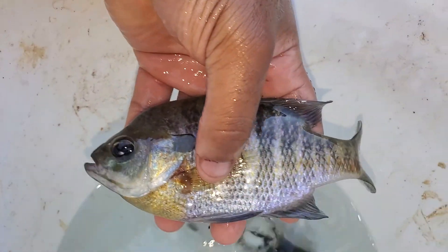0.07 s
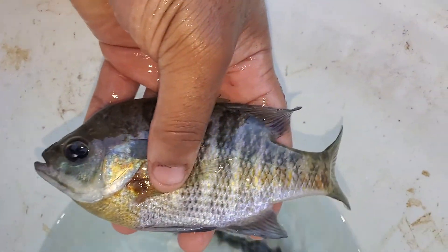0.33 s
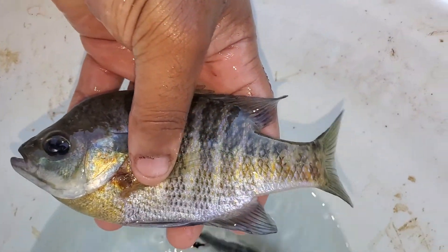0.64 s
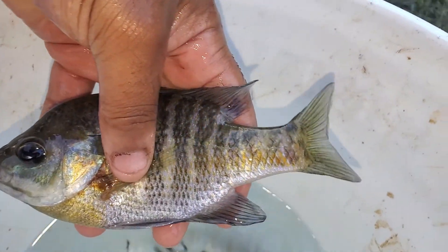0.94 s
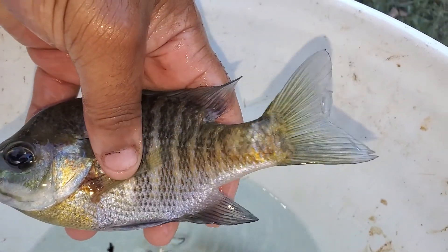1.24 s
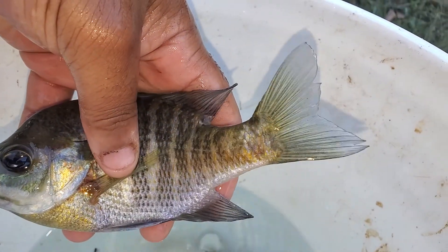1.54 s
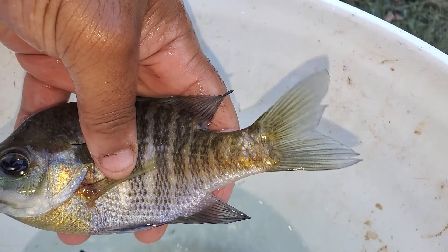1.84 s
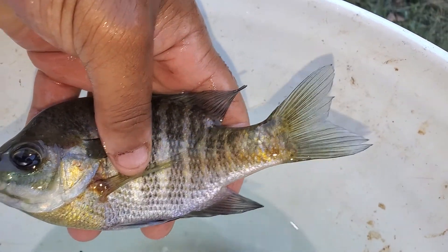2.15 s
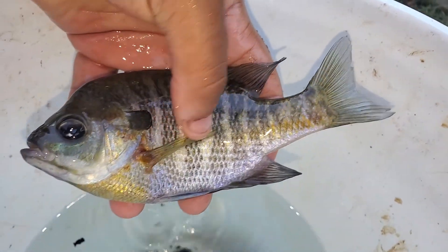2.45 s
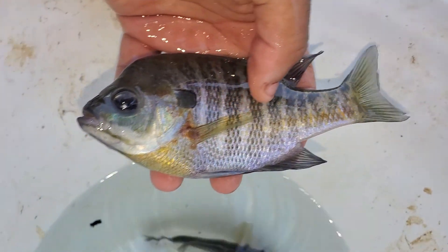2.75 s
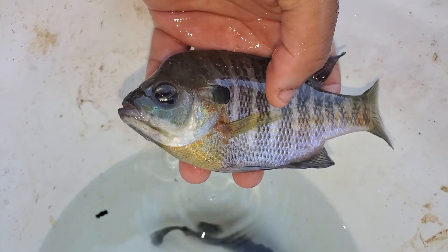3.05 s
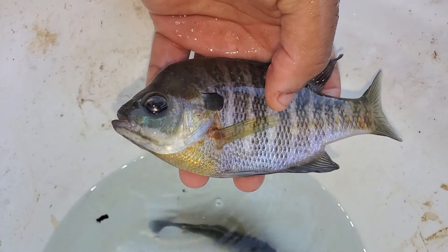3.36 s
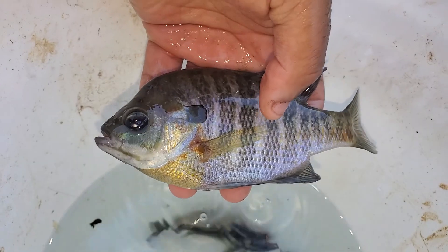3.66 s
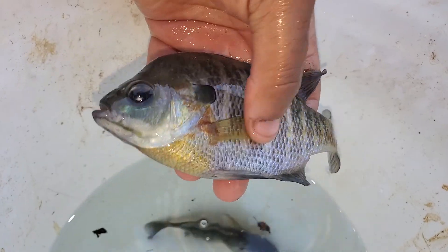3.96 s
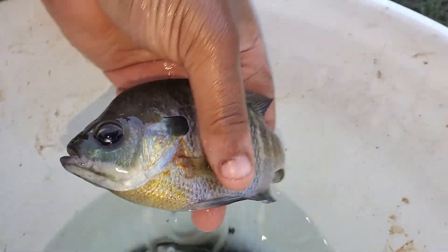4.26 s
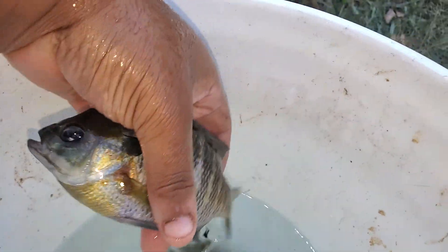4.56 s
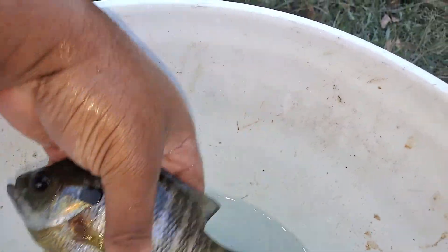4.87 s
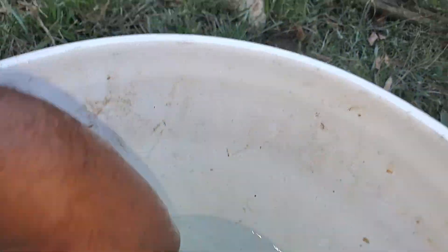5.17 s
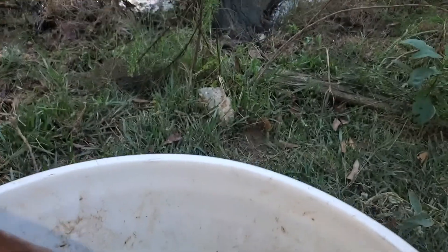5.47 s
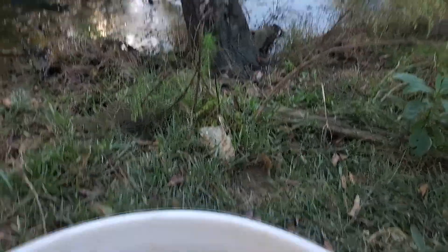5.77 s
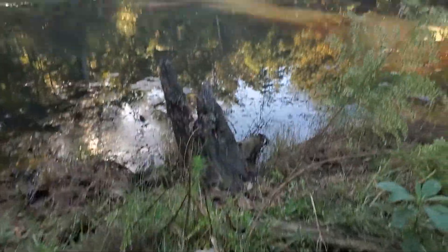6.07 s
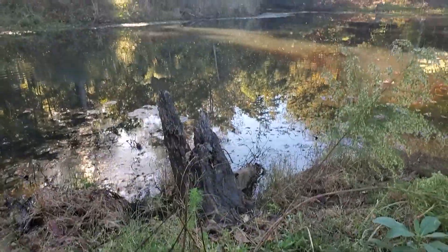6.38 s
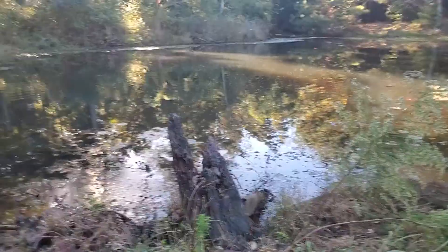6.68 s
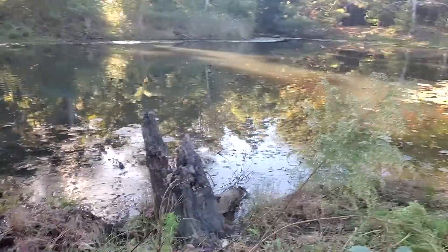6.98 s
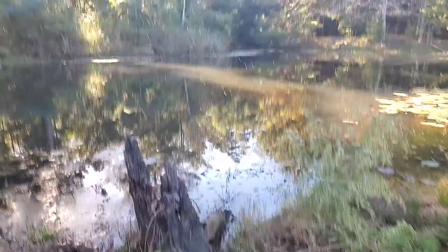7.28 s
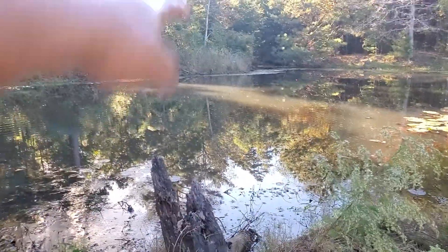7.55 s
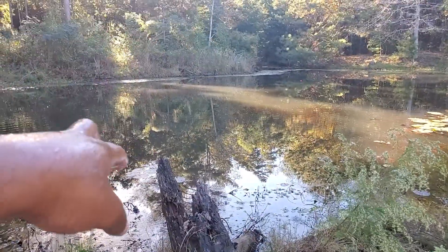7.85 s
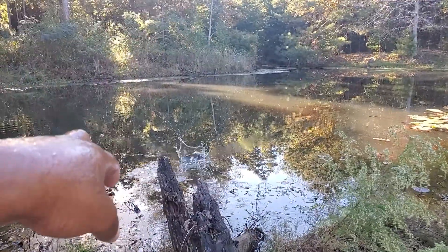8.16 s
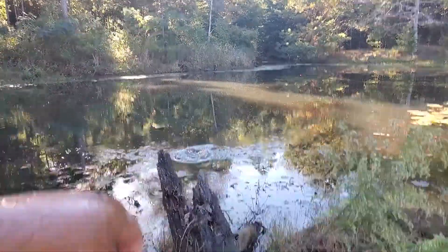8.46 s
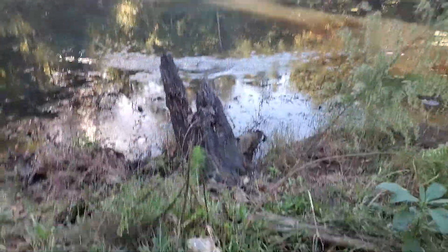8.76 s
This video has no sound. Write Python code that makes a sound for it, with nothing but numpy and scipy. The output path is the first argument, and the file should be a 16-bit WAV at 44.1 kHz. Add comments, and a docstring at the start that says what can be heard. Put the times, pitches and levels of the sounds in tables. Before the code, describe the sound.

Insects trill and tick outdoors over sparse drips and soft bucket bumps, until a fish slaps into the water and spray patters down.

```python
"""A fish tossed into a creek: a sharp slap, ringing bubbles, spray falling back.
Before the toss it drips into a plastic bucket, each drop a tick and a trapped bubble, amid wet clicks
and soft bumps. Crickets trill and katydids tick and buzz by rubbing their wings. A far bird repeats
a falling whistle and an engine drones by, over distant rumble and insect haze."""
import sys
import numpy as np
from scipy import signal
from scipy.fft import rfft, irfft, next_fast_len
from scipy.io import wavfile
from scipy.ndimage import uniform_filter1d

SR = 44100
rng = np.random.default_rng(int(sys.argv[2]) if len(sys.argv) > 2 else 0)


def persist_wave(psi):
    """Save psi, clipped to +-1, as 16-bit WAV."""
    counts = np.round(np.clip(psi, -1, 1) * 32767).astype(np.int16)
    wavfile.write(sys.argv[1], SR, np.atleast_2d(counts).T)


N = 397782
TIME = np.arange(N) / SR

# Levels are relative within a table. Pan is left minus right. t60 is the time to fall 60 dB.
# Fish impacts. Each row: start in seconds, level in dB, spray t60 in seconds.
SLAP_HITS = [(7.9957, -40.5, 0.051), (8.005, -43, 0.035), (8.008, -13.5, 0.0062), (8.0091, -15, 0.0088),
             (8.0097, -42, 0.014)]
# Slap and spray spectra. Each row: frequency in Hz, density in dB.
SLAP_SPECTRUM = [(88, -43), (150, -9.5), (439, -21), (774, -6), (1140, -15), (1450, -5.5), (2400, -14),
                 (3220, -5.5), (4320, -7.5), (6390, 4), (7180, -0.5), (8230, -20), (11300, -11),
                 (15100, -3), (16000, -9.5)]
SPRAY_SPECTRUM = [(200, -16), (450, -29), (1500, 1.5), (2000, -5), (3300, 0), (4600, -2), (7000, -4.5),
                  (8500, -17.5), (11500, -4), (15000, -4), (16000, -21)]
# Water falling back. Each row: peak time, rise and t60 in seconds, bubbling and spray levels in dB.
SPLASH_SURGES = [(8.02, .01, 0.63, -58, -59), (8.11, 0.028, 0.21, -69, -53.5),
                 (8.22, 0.079, 0.57, -45.5, -44.5), (8.30, 0.028, 0.14, -45, -47.5),
                 (8.35, 0.049, 0.12, -44.5, -69), (8.445, 0.0077, 0.98, -50.5, -48),
                 (8.63, 0.058, 0.33, -52.5, -56), (8.928, 0.042, 0.69, -52.5, -53)]
# Largest creek bubbles; bucket drips. Each row: start in seconds, level in dB, bubble pitch in Hz,
# t60 in seconds, impact tick offset in dB, pan in dB.
CREEK_PLOPS = [(8.086, -48.5, 3250, 0.028, -13, -2), (8.154, -50, 1530, 0.019, -3, 11),
               (8.209, -58, 2180, 0.015, -3, 8), (8.229, -43.5, 940, 0.016, -21, 1),
               (8.231, -48, 1480, 0.015, -11, 11), (8.292, -44, 3880, 0.024, -19, 0),
               (8.336, -51, 2300, 0.022, -22, 19), (8.343, -59, 707, 0.073, -16, -1),
               (8.436, -46, 234, 0.045, 2.5, -0.5), (8.925, -48.5, 3860, 0.031, -2.5, -7.5),
               (8.928, -45, 1403, 0.031, -15, 17)]
BUCKET_DRIPS = [(.0475, -35.5, 3300, 0.034, -6, 2), (1.273, -37.5, 2320, 0.02, 2, 8),
                (1.6555, -29, 2580, 0.0078, -26, 7), (1.6575, -30, 3670, 0.017, -11.5, 25),
                (1.6605, -33.5, 3200, 0.034, -14, -13), (1.7862, -40.5, 1740, 0.05, 1, 18),
                (2.8868, -38, 1720, 0.038, -12.5, 19), (2.892, -49, 4320, 0.029, 7, 20),
                (2.897, -44.5, 1594, 0.038, -18, 15), (3.379, -42, 3170, 0.028, -0.5, 11),
                (6.671, -59, 1850, 0.024, 4.5, 15)]
# Bumps on the bucket. Each row: start in seconds, level in dB, factor on the mode frequencies.
BUCKET_BUMPS = [(3.722, -60.5, 1.13), (4.078, -43.5, 1.04), (4.383, -55, 0.97), (4.398, -54, 0.6),
                (5.072, -42, 0.48)]
# Bucket wall modes. Each row: base frequency in Hz, level in dB, t60 in seconds.
WALL_MODES = [(243, 5, 0.089), (328, -25, 0.02), (600, -3.5, 0.0096), (900, -42, 0.019), (1500, -22, 0.044)]
# Fins, fingers, flying drops. Each row: start in seconds, level in dB, centre and width in Hz, pan in dB.
WET_CLICKS = [(0.048, -38.5, 9900, 3600, 8), (2.4743, -37.5, 6360, 700, -5), (4.1007, -31, 6660, 1060, 2),
              (4.1, -35.5, 12900, 2500, -3), (4.94, -33.5, 7850, 1270, -7), (4.941, -39, 12900, 2500, 0),
              (8.1008, -32, 12000, 1300, -16), (8.119, -36.5, 4500, 1500, -3),
              (8.196, -36.5, 12100, 2520, -10), (8.357, -43.5, 12700, 2200, -8),
              (8.463, -39.5, 4560, 2510, -7), (8.968, -36, 8060, 2800, 5)]
# Hand and grass. Each row: start in seconds, level in dB, centre in Hz, t60 in seconds.
HAND_SCUFFS = [(5.074, -70.5, 600, 0.58), (5.80, -61.5, 500, 0.17), (6.0, -70.5, 900, 0.29),
               (6.08, -68, 900, 0.31), (6.93, -73, 450, 0.68)]
# Near katydid's ticks. Each entry: start in seconds.
TICK_STARTS_S = [1.252, 1.3598, 1.505, 1.618, 1.758, 1.873, 1.9769, 2.081, 2.203, 2.3092, 2.419, 2.5505,
                 2.663, 2.778, 2.9337, 3.0985, 3.225, 3.3763, 3.5765, 3.709, 3.883, 4.017, 4.388, 4.5775,
                 4.737, 4.934, 5.185]
# Its effort builds, holds, tires. Each row: time in seconds, level in dB.
TICK_LEVELS = [(1.25, -49), (1.62, -41), (2.2, -39.5), (3.38, -39.5), (3.58, -45.5), (4.02, -40.5),
               (4.39, -48.5), (5.2, -45.5)]
# Tick spectrum. Each row: frequency in Hz, density in dB.
TICK_SPECTRUM = [(5000, -44), (8500, -5), (10400, -14.5), (10800, -5.5), (12000, -3.5), (13100, 1),
                 (14300, -.5), (15500, -2), (16000, -42)]
# Farther katydids. Each row: start, end and period in seconds, first level in dB, fade in dB per second.
ANSWER_RUNS = [(2.358, 3.3, 0.13, -46.5, 7), (3.791, 4.6, .134, -56, 0), (7.745, 8.0, 0.115, -57, -5)]
# Katydid buzzes. Each row: start and end in seconds, level in dB, strokes per second,
# first centre, last centre and width in Hz, pan in dB.
KATYDID_BUZZES = [(-.1, 1.199, -55, 34.4, 12660, 12980, 1370, -6.5),
                  (4.616, 6.1, -64.5, 32, 13800, 12250, 710, -13),
                  (5.388, 5.88, -66, 35, 14800, 14400, 600, -11),
                  (5.779, 6.418, -60.5, 28, 13800, 13700, 700, -14),
                  (8.66, 9.1, -57, 31, 13900, 14100, 900, -11.5)]
# Cricket chorus. Each row: time in seconds, low and high trill levels in dB.
CHORUS_LEVELS = [(0.0, -64, -69), (0.24, -66, -65.5), (1.08, -69, -64.5), (1.98, -66, -64),
                 (3.65, -69, -66.5), (5.79, -65.5, -59), (6.34, -67, -64), (6.93, -64, -62),
                 (7.9, -68, -65)]
# Nearer cricket. Each row: start and end in seconds, level in dB.
TRILL_PHRASES = [(1.68, 2.58, -64), (4.199, 4.934, -64.5), (6.412, 6.737, -68.5), (6.748, 7.244, -62.5)]
# Ground cricket. Each row: start, end and chirp period in seconds, level in dB.
CHIRP_PHRASES = [(.02, 1.8, .28, -67), (1.97, 2.7, 0.25, -66), (2.739, 7.3, 0.25, -74),
                 (4.111, 4.9, .277, -70.5), (5.455, 6.5, .24, -66.5), (6.781, 7.35, .49, -62),
                 (7.57, 9.6, .29, -64)]
# Bird calls. Each row: start in seconds, level in dB, first and last pitch in Hz, length in seconds.
BIRD_WHISTLES = [(-.15, -60, 3360, 2974, 0.55), (2.72, -65.5, 3374, 3020, 0.49),
                 (4.534, -62, 3296, 2966, 0.53), (6.706, -60, 3367, 2798, 0.44),
                 (8.617, -63, 3380, 2944, 0.46)]
# Engine speed. Each row: time in seconds, firing rate in Hz.
FIRING_RATES = [(5.2, 68.6), (5.9, 68.14), (6.4, 67.43), (6.8, 66.8), (7.1, 67.5), (7.4, 71.36)]
# Engine roar spectrum. Each row: frequency in Hz, density in dB.
ROAR_SPECTRUM = [(150, 15), (250, 5.5), (400, -6), (750, 1.5), (1100, -7.5), (1800, -14.5), (3000, -26.5),
                 (5000, -13.5)]
# Far hoots. Each row: start and end in seconds, level in dB, pitch in Hz.
FAR_HOOTS = [(0.155, 0.448, -83, 635), (3.196, 3.577, -78.5, 631), (7.503, 7.752, -74.5, 713)]
# Outdoor air. Each row: frequency in Hz, then density in dB, left-right correlation or pan in dB.
AIR_SPECTRUM = [(15, -20), (40, -7.5), (80, 6.5), (125, -11.5), (240, -11.5), (330, -25), (460, -30.5),
                (700, -24.5), (1100, -35), (2200, -35), (3900, -38.5), (7800, -21), (10000, -26.5),
                (16000, -26.5)]
AIR_CORRELATION = [(30, 1), (250, 0.8), (700, 0.018), (2000, 0), (8000, 0)]
AIR_PAN = [(30, -1), (2000, 4.5), (5000, -3), (8000, -2), (14000, -6)]
# Distant rumble. Each row: time in seconds, level in dB.
RUMBLE_LEVELS = [(0, 2), (1.6, 3.5), (2.8, -3), (4.7, -2.5), (5.8, 8), (7.6, -4), (8.2, 4.5), (9.0, 4)]


def creek():
    """The landing fish, echoed by banks and trees."""
    water = slap() + splash() + drops(CREEK_PLOPS, bubble_db=6.5, tick_db=-2, tick_hz=1760, width_hz=1500)
    return water + gain(-7) * echoes(water, t60_s=.021) + gain(-18.5) * echoes(water, t60_s=.98)


def slap():
    """The flank smacks the surface: impulses, each with a burst of spray."""
    out, t = np.zeros((2, N)), np.arange(3000) / SR
    impulse = 3.1 * (t == 0)
    for s, db, t60_s in SLAP_HITS:
        spray = 1.02 * rng.standard_normal((2, len(t))) * gain(-60 * t / t60_s)
        add(out, s, gain(db) * (impulse + spray))
    return colour(out, SLAP_SPECTRUM) * pan(-5)


def splash():
    """The crater closes in gurgling bubbles; droplets patter back; the falling jet churns."""
    gurgle = bubble_swarm(low_hz=600, high_hz=2330, cycles=22, spread_db=15, count=420) * pan(5.9)
    plinks = bubble_swarm(low_hz=2290, high_hz=7100, cycles=48, spread_db=37, count=400) * pan(-1.9)
    fizz = bubble_swarm(low_hz=6600, high_hz=15000, cycles=30, spread_db=24, count=600) * pan(-32)
    sizes = gain(3 * np.minimum(rng.exponential(1, N), 4.5))
    droplets = sizes * (rng.random(N) < 5000 / SR)  # 5000 a second
    patter = unit_rms(colour(droplets * rng.standard_normal((2, N)), SPRAY_SPECTRUM)) * pan(-1.4)
    spray = gain(2.5) * patter + gain(-9) * plinks + gain(-6.5) * fizz
    churn = gain(-60) * gate(8.43, 8.72, fade_s=.13) * band_noise(340, 290, N)
    gurgle_gain, spray_gain = surges()
    return gain(-6) * gurgle * gurgle_gain + spray * spray_gain + churn


def surges():
    """Bubbling and spray gains: surges well up and decay; their powers add."""
    bubbling_power, spray_power = np.zeros((2, N))
    for s, rise_s, t60_s, bubbling_db, spray_db in SPLASH_SURGES:
        attack = np.clip(1 + (TIME - s) / rise_s, 0, 1)
        envelope = attack * gain(-60 * np.clip((TIME - s) / t60_s, 0, 2))
        bubbling_power += (gain(bubbling_db) * envelope) ** 2
        spray_power += (gain(spray_db) * envelope) ** 2
    return np.sqrt(bubbling_power), np.sqrt(spray_power)


def bubble_swarm(low_hz, high_hz, cycles, spread_db, count, start_s=8):
    """One second of bubbles, levelled; small ones die sooner, shallow ones glide more."""
    out = np.zeros((2, N))
    for delay_s, small, loud, side, shallow in rng.random((count, 5)):
        hz = low_hz * (high_hz / low_hz) ** small
        ring = bubble(hz, cycles / hz, glide=.2 * shallow ** 2, attack=.049)
        add(out, start_s + delay_s, gain(spread_db * loud ** 2) * pan(14 * (side - .5)) * ring)
    power = uniform_filter1d((out ** 2).mean(0), 3000)
    return out / np.sqrt(np.maximum(power, .01 * power.max()))


def bubble(hz, t60_s, glide, attack):
    """Trapped air rings: it swells as the neck closes and rises in pitch near the surface."""
    t = np.arange(int(1.5 * t60_s * SR)) / SR
    envelope = (1 - np.exp(-t / (attack * t60_s))) ** 2 * gain(-60 * t / t60_s)
    ring = envelope * np.sin(2 * np.pi * hz * t * (1 + glide * t / t60_s))
    return ring / abs(ring).max()


def drops(rows, bubble_db, tick_db, tick_hz, width_hz):
    """Each drop ticks on the surface and leaves a ringing bubble."""
    out, t = np.zeros((2, N)), np.arange(800) / SR
    for s, db, hz, t60_s, impact_db, pan_db in rows:
        add(out, s, gain(db + bubble_db) * pan(pan_db) * bubble(hz, t60_s, glide=.035, attack=.047))
        tick = band_noise(tick_hz, width_hz, len(t)) * np.exp(-t / .0071)
        add(out, s, gain(db + impact_db + tick_db) * pan(.5) * tick)
    return out


def bucket():
    """Drips, and bumps that ring the plastic walls, with short reflections."""
    out = drops(BUCKET_DRIPS, bubble_db=3.5, tick_db=-5.5, tick_hz=5060, width_hz=2260)
    t = np.arange(5000) / SR
    for s, db, factor in BUCKET_BUMPS:
        wall = sum(gain(mode_db - 60 * t / t60_s) * np.sin(2 * np.pi * factor * hz * t)
                   for hz, mode_db, t60_s in WALL_MODES)
        add(out, s, gain(db - 2.5) * pan(1) * wall)
    return out + gain(-7) * echoes(out, t60_s=.035) + gain(-25) * echoes(out, t60_s=.2)


def handling():
    """Wet clicks of fins, fingers and drops; grainy scuffs of hand and grass."""
    out, t = np.zeros((2, N)), np.arange(12000) / SR
    snap = ((1 - np.exp(-t / .00035)) ** 2 * np.exp(-t / .0026))[:1500]
    for s, db, hz, width_hz, pan_db in WET_CLICKS:
        add(out, s, gain(db + 3) * pan(pan_db) * band_noise(hz, width_hz, len(snap)) * snap)
    for s, db, hz, t60_s in HAND_SCUFFS:
        grain = gain(3.4 * unit_rms(uniform_filter1d(rng.standard_normal(len(t)), 300)))
        add(out, s, gain(db + 6.5 - 60 * t / t60_s) * grain * band_noise(hz, .44 * hz, len(t)))
    return out + gain(-10) * echoes(out, t60_s=.046)


def katydids():
    """Rasping wings: single ticks, and gliding buzzes of even strokes."""
    out, t = np.zeros((2, N)), np.arange(1200) / SR
    scrape = np.interp(t, [0, .0008, .009, .015], [.3, 1.15, .96, .084])
    for s, db, hz in katydid_ticks():
        rasp = unit_rms(colour(band_noise(hz, 2930, len(t)), TICK_SPECTRUM))
        add(out, s, gain(db - 1.5) * pan(-9) * scrape * rasp)
    for start_s, end_s, db, rate_hz, first_hz, last_hz, width_hz, pan_db in KATYDID_BUZZES:
        size = int((end_s - start_s) * SR)
        rasp = unit_rms(band_noise(0, width_hz, size) * sine(np.linspace(first_hz, last_hz, size)))
        strokes = unit_rms(1 + .71 * np.sin(2 * np.pi * rate_hz * TIME[:size]))
        add(out, start_s, gain(db) * pan(pan_db) * signal.windows.tukey(size, .16) * strokes * rasp)
    return out + gain(-10) * echoes(out, t60_s=.19)


def katydid_ticks(centre_hz=13700, scatter=.022, jitter_s=.0046):
    """Start, level and noise centre per tick: near katydid, then answering runs."""
    timing, detuning = rng.standard_normal((2, 100))
    near = [(s, np.interp(s, *np.transpose(TICK_LEVELS))) for s in TICK_STARTS_S]
    runs = [(s, db - fade_db_per_s * (s - start_s))
            for start_s, end_s, period_s, db, fade_db_per_s in ANSWER_RUNS
            for s in np.arange(start_s, end_s, period_s)]
    far = [(s - jitter_s * draw, db) for (s, db), draw in zip(runs, timing)]
    return [(s, db, centre_hz * (1 + scatter * draw)) for (s, db), draw in zip(near + far, detuning)]


def crickets():
    """Chorus and one nearer singer, scattered by the grass."""
    out = cricket_chorus() + near_cricket()
    return out + gain(-5.5) * echoes(out, t60_s=.45)


def cricket_chorus(slow_peak_s=4.8, slow_fade_db_per_s=4.5):
    """Two low singers and a high one over a blur of their kind; the slower low one comes and goes."""
    s, low_db, high_db = np.transpose(CHORUS_LEVELS)
    slow_gain, fast_gain = gain(1 - slow_fade_db_per_s * abs(TIME - slow_peak_s)), gain(-4.5)
    slow = from_right(stridulate(5180, rate_hz=57.5, sweep=.087, duty=.6), lag_s=.00027)
    low = slow_gain * slow * pan(-.57) + band_noise(5196, 375, N)
    low += fast_gain * stridulate(5120, rate_hz=66.7, sweep=.17, duty=.45) * pan(6.9)
    low /= np.sqrt(1 + slow_gain ** 2 + fast_gain ** 2)
    high = from_right(stridulate(7050, rate_hz=43.8, sweep=.15, duty=.47), lag_s=.00017)
    high += gain(-2.5) * band_noise(7030, 330, N)
    low *= gain(np.interp(TIME, s, low_db) + 2.5)
    high *= gain(np.interp(TIME, s, high_db) - .14)
    return low + high * pan(-5)


def near_cricket(skips_per_s=5.1, skip_s=.035):
    """Trilled phrases that skip a stroke or two now and then."""
    phrases = sum(gain(db) * gate(start_s, end_s, fade_s=.023) for start_s, end_s, db in TRILL_PHRASES)
    since_skip_s = np.cumsum(skips_per_s * (1 + .4 * drift(1.8))) / SR % 1 / skips_per_s
    singing = uniform_filter1d(1.0 * (since_skip_s > skip_s), size=400)
    return phrases * singing * stridulate(5467, rate_hz=66.5, sweep=.02, duty=.54)


def ground_crickets(pitch_hz=9070, sag_hz_per_s=18, stroke_hz=112):
    """Chirps of quick wing pulses, slowly sinking in pitch; a lower singer keeps its own time."""
    out, t = np.zeros((2, N)), np.arange(int(.062 * SR)) / SR
    stroke = t * stroke_hz % 1
    pulses = np.sin(np.pi * stroke) ** 2 * signal.windows.tukey(len(t), .4)
    chirps = [(s, db) for start_s, end_s, period_s, db in CHIRP_PHRASES
              for s in np.arange(start_s, end_s, period_s)]
    for (s, db), scatter_db in zip(chirps, -2.5 * rng.standard_normal(100)):
        hz = (pitch_hz - sag_hz_per_s * s) * (1 + .091 * (.5 - stroke))
        add(out, s, gain(db + scatter_db + 7) * pan(-11) * sine(hz) * pulses)
    chirping = np.maximum(sine(5 + .5 * drift(2.6)), 0) ** 4
    lower = chirping * stridulate(8050, rate_hz=105, sweep=.11, duty=.96)
    out += gain(np.interp(TIME, [3.5, 5.5], [-72, -67.5])) * pan(-47) * lower
    return out + gain(-5.5) * echoes(out, t60_s=.087)


def stridulate(hz, rate_hz, sweep, duty):
    """Each wing closure draws one pure pulse that sags in pitch."""
    stroke = np.cumsum(rate_hz * (1 + .012 * drift(4))) / SR % 1 / duty
    pitch_hz = hz * (1 + sweep * (.5 - stroke) + .006 * drift(90))
    return unit_rms(np.sin(np.pi * np.minimum(stroke, 1)) * sine(pitch_hz))


def bird():
    """A falling whistle, growing hoarse, echoed by the woods."""
    out, quaver = np.zeros((2, N)), drift(200)
    for s, db, first_hz, last_hz, length_s in BIRD_WHISTLES:
        progress = np.arange(int(length_s * SR)) / (length_s * SR)
        hoarseness = (.018 + .032 * progress) * quaver[:len(progress)]
        hz = (first_hz + (last_hz - first_hz) * progress) * (1 + hoarseness)
        swell = np.interp(progress, [0, .2, .5, 1], [.26, .55, .61, .14])
        add(out, s, gain(db + 4) * pan(0) * swell * sine(hz))
    return .45 * out + echoes(out, t60_s=1)


def engine(hold_start_s=5.856, hold_end_s=7.03, rise_db_per_s=43, fall_db_per_s=46):
    """Four wavering exhaust orders and a dull roar come up, hold and die away."""
    firing_hz = np.interp(TIME, *np.transpose(FIRING_RATES)) * (1 + .0091 * drift(19))
    phase = 2 * np.pi * np.cumsum(firing_hz) / SR
    first, second, third, fourth = (np.sqrt(2) * np.sin(k * phase + k * k) * gain(1.1 * drift(14))
                                    for k in range(1, 5))
    swell_db = -rise_db_per_s * np.maximum(hold_start_s - TIME, 0)
    swell_db -= fall_db_per_s * np.maximum(TIME - hold_end_s, 0)
    dip_db = 12 * np.exp(-((TIME - 6.3) / .36) ** 2)  # the fundamental sinks midway
    hum = gain(-43.5 - dip_db) * first
    hum += gain(-53.5) * (second + gain(-12.5) * third + gain(-33) * fourth)
    noise = rng.standard_normal((2, N))
    roar = unit_rms(colour(noise + .15 * noise[::-1], ROAR_SPECTRUM))
    return hum * gain(swell_db) + roar * gain(-58 + .51 * swell_db)


def hoots():
    """Soft narrow tones from across the water."""
    out = np.zeros((2, N))
    for start_s, end_s, db, hz in FAR_HOOTS:
        size = int((end_s - start_s) * SR)
        add(out, start_s, gain(db + 6) * band_noise(hz, 25, size) * signal.windows.hann(size))
    return out


def air(level_db=-55.5):
    """Distant rumble and insect haze, drifting in patches."""
    frames, hz = N // 512 + 5, np.fft.rfftfreq(2048, 1 / SR)
    left_re, left_im, other_re, other_im, patches = rng.standard_normal((5, frames, len(hz)))
    patches_db = 3 * unit_rms(uniform_filter1d(uniform_filter1d(patches, 10, axis=0), 14, axis=1))
    correlation, lean = at_hz(AIR_CORRELATION, hz), gain(at_hz(AIR_PAN, hz) / 2)
    left = left_re + 1j * left_im
    right = correlation * left + np.sqrt(1 - correlation ** 2) * (other_re + 1j * other_im)
    rumble_db = np.interp(np.arange(frames) * 512 / SR, *np.transpose(RUMBLE_LEVELS))[:, None]
    spectra = np.array([left * lean, right / lean])
    spectra *= gain(at_hz(AIR_SPECTRUM, hz) + patches_db + rumble_db / (1 + (hz / 220) ** 2))
    _, noise = signal.istft(spectra.swapaxes(1, 2), nperseg=2048, noverlap=1536)
    return gain(level_db) * unit_rms(noise[:, :N])


def echoes(x, t60_s):
    """Scattered reflections of unit energy, different at each ear."""
    t = np.arange(SR) / SR
    taps = rng.standard_normal((2, SR)) * (rng.random((2, SR)) < .1)
    taps = (taps * gain(-60 * t / t60_s) * (t > .002))[:, :int(t60_s * SR)]
    taps /= np.linalg.norm(taps, axis=1, keepdims=True)
    return signal.oaconvolve(x, taps, axes=1)[:, :N]


def colour(x, spectrum):
    """Minimum-phase filter of unit energy."""
    db = np.maximum(at_hz(spectrum, abs(np.fft.fftfreq(2048, 1 / SR))), -100)
    response = np.exp(np.conj(signal.hilbert(np.log(gain(db)))))
    taps = np.fft.ifft(response).real
    return signal.oaconvolve(x, taps[None] / np.linalg.norm(taps), axes=1)[:, :x.shape[1]]


def band_noise(hz, width_hz, size):
    """Stereo noise in a Gaussian band, rms 1."""
    length = 512 * next_fast_len(size // 512 + 1)
    offset = (np.fft.rfftfreq(length, 1 / SR) - hz) / width_hz
    bell = np.exp(-.5 * np.minimum(offset ** 2, 60))
    return unit_rms(irfft(rfft(rng.standard_normal((2, length))) * bell, length)[:, :size])


def drift(rate_hz):
    """Random wander, rms 1."""
    knots = rng.standard_normal(2000)
    return unit_rms(np.interp(TIME * rate_hz, np.arange(len(knots)), knots))


def sine(hz):
    """Sine following a frequency curve."""
    return np.sin(2 * np.pi * np.cumsum(hz) / SR)


def gate(start_s, end_s, fade_s):
    """Gate with linear fades."""
    return np.clip(np.minimum(TIME - start_s, end_s - TIME) / fade_s, 0, 1)


def from_right(x, lag_s):
    """Sound from the right reaches the left side later."""
    return np.array([np.roll(x, round(lag_s * SR)), x])


def pan(db):
    """Constant-power left and right gains."""
    return unit_rms(gain([[db / 2], [-db / 2]]))


def add(mix, s, sound):
    """Mixes a stereo sound in at s seconds."""
    start = round(s * SR)
    part = mix[:, max(start, 0):max(start + sound.shape[1], 0)]
    part += sound[:, max(-start, 0):][:, :part.shape[1]]


def at_hz(table, hz):
    """Interpolates a table over log frequency."""
    knots_hz, values = np.transpose(table)
    return np.interp(np.log(hz + 1), np.log(knots_hz + 1), values)


def gain(db):
    """Decibels to amplitude."""
    return 10 ** (np.asarray(db) / 20)


def unit_rms(x):
    """Scales to rms 1."""
    return x / np.sqrt(np.mean(x ** 2) + 1e-20)


def scene():
    """The creek bank, in stereo."""
    wildlife = crickets() + ground_crickets() + katydids() + bird() + hoots()
    return air() + engine() + wildlife + bucket() + handling() + creek()


def record(dry, cutoff_hz=16100):
    """The recorder's band limit."""
    lowpass = signal.firwin(255, cutoff_hz, window=("kaiser", 9), fs=SR)
    return signal.oaconvolve(dry, lowpass[None], "same")


dry = scene()
out = record(dry)
persist_wave(out)
```